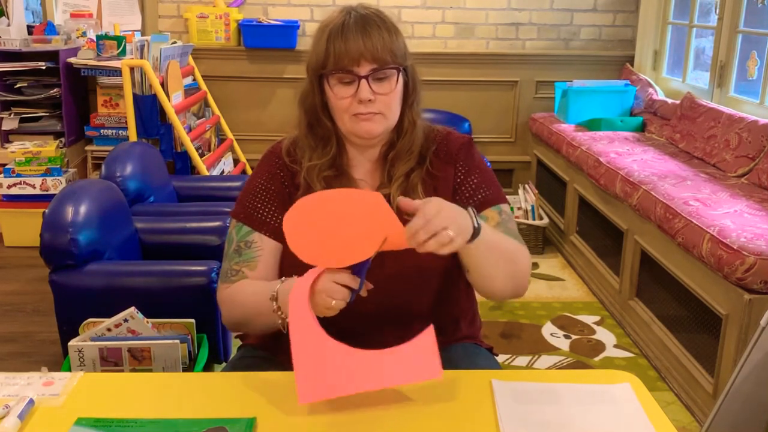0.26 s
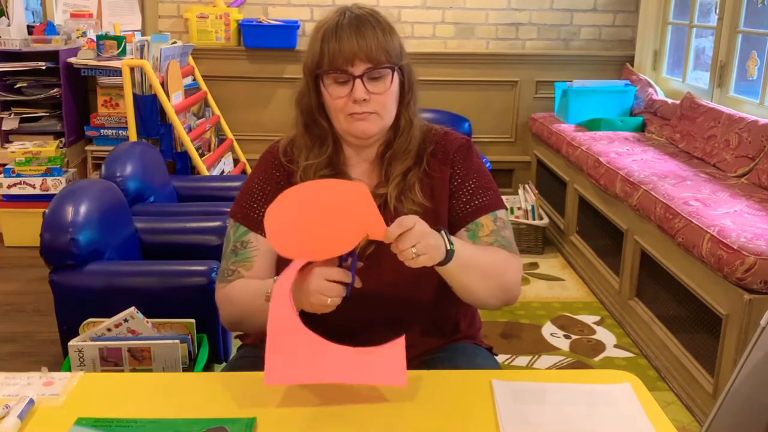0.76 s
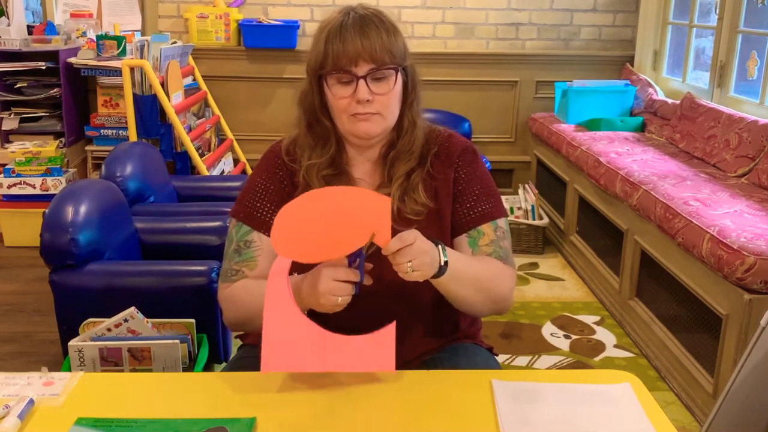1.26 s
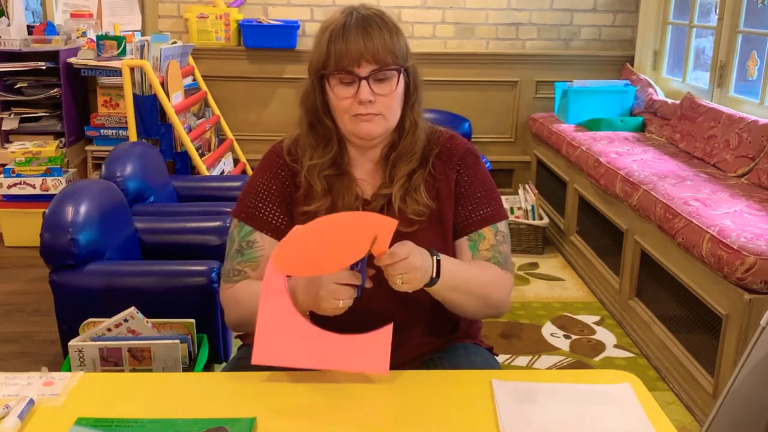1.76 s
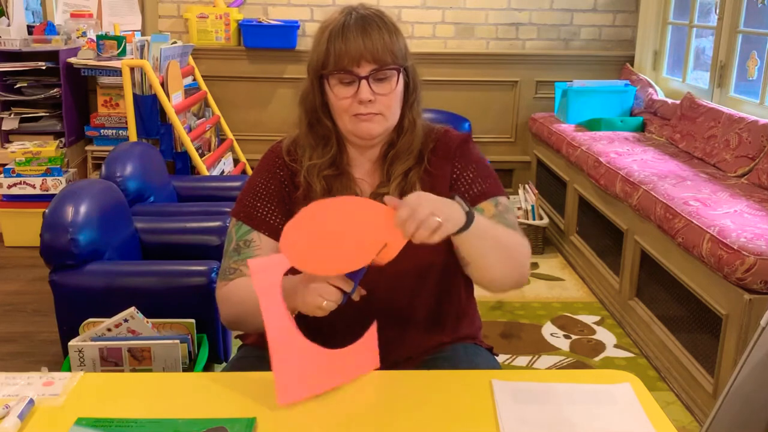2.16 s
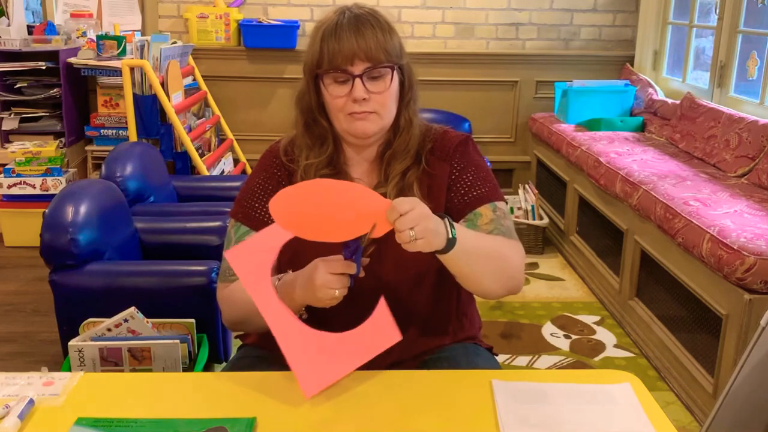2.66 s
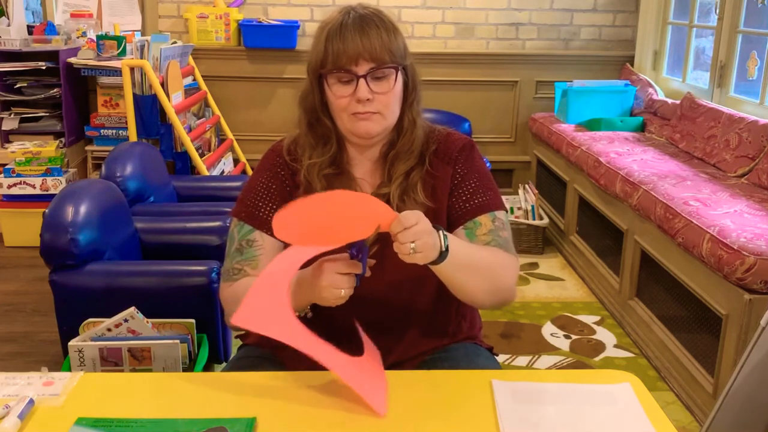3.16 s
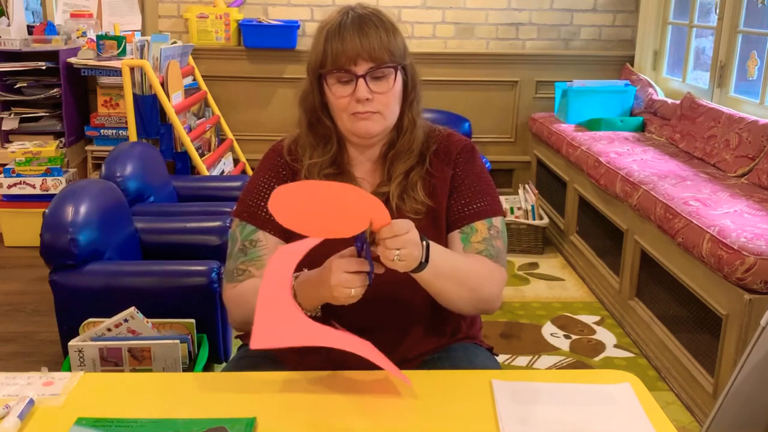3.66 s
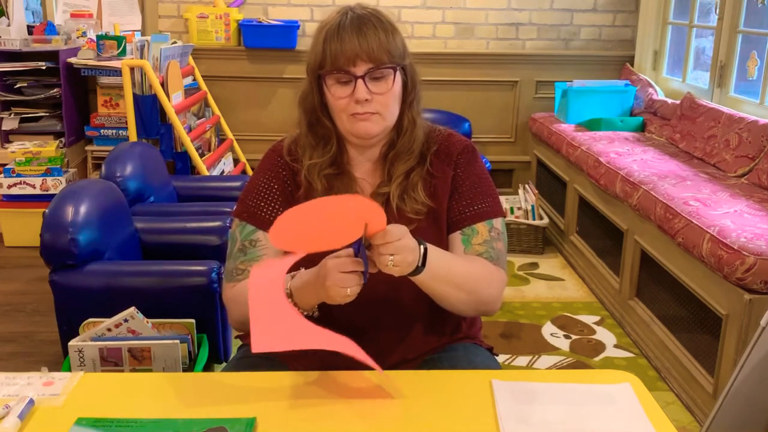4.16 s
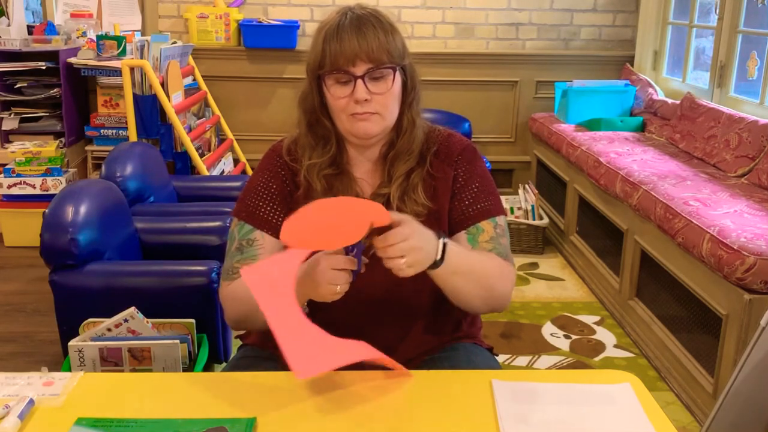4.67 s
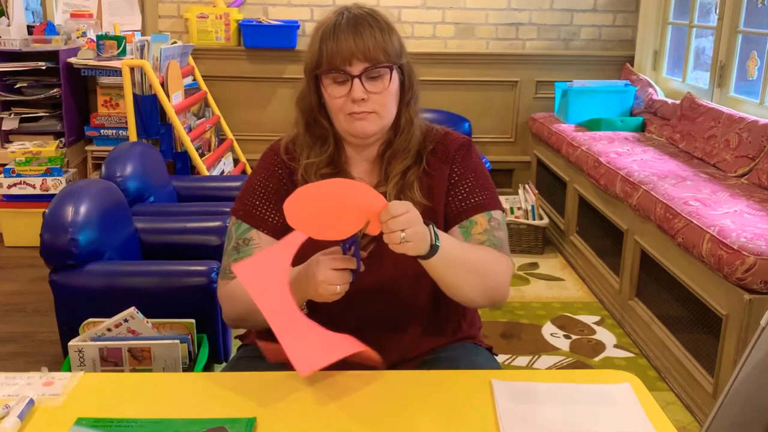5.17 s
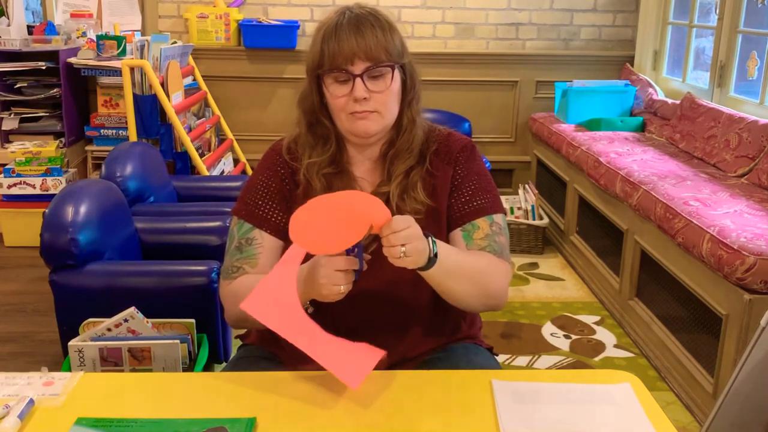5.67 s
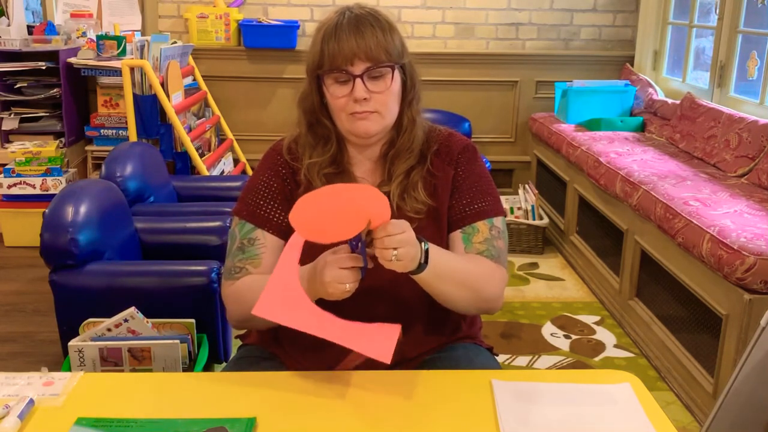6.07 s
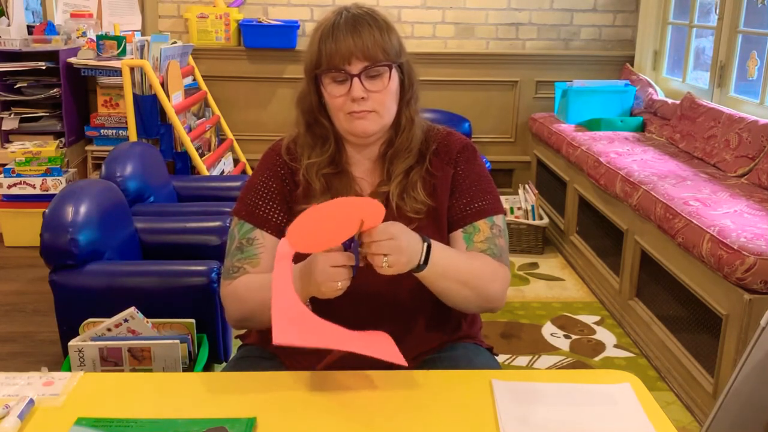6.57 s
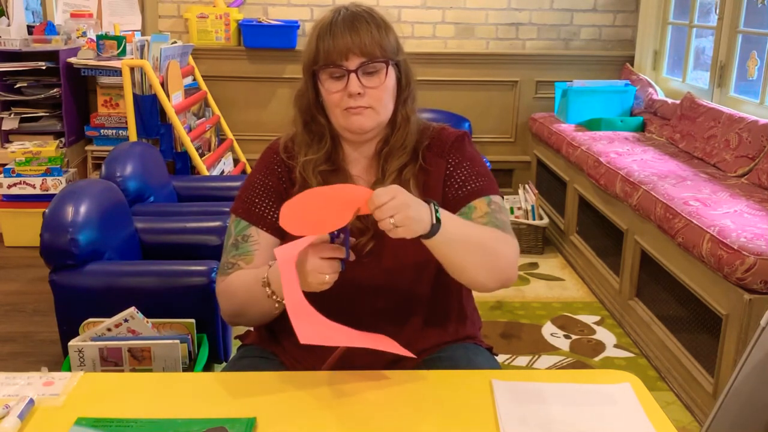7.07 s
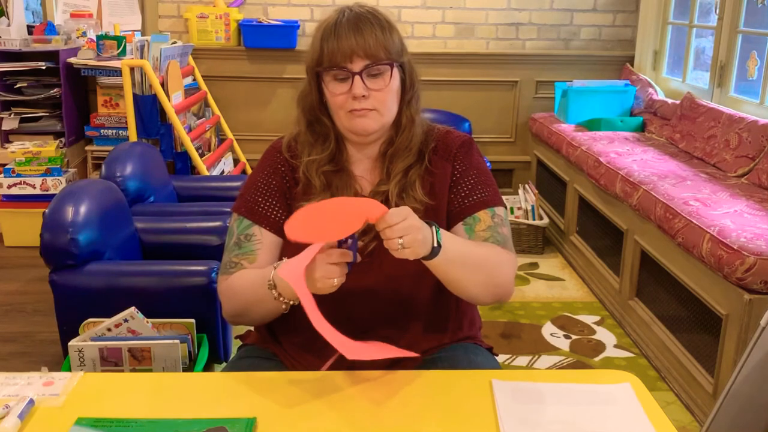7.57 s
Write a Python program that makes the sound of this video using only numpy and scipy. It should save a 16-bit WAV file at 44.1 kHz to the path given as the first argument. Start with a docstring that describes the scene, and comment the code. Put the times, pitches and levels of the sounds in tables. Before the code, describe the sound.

Crisp paper cutting, about four snips a second with short breaks, the stiff sheet rustling and buckling between cuts over faint ventilation hum.

```python
"""Small scissors snip stiff paper in a quiet playroom, about four times a second, in five runs.
Each snip closes the blades through a shower of breaking fibres, then reopens them more softly.
Between and during the runs the sheet slides, flaps, swishes, knocks and pops as it buckles.
Noise bursts pass through the resonances of paper and steel; sines make knocks, ventilation hum and far engines.
The room adds its echoes, and two close microphone ports give the left and right channels."""
import sys
import numpy as np
from scipy import signal
from scipy.fft import rfft, irfft
from scipy.io import wavfile

SR = 44100
rng = np.random.default_rng(int(sys.argv[2]) if len(sys.argv) > 2 else 0)


def output_pcm(signal):
    """Save a mono or channel-first signal as 16-bit PCM at the path in sys.argv[1].

    Samples are clipped to [-1, 1] before scaling.
    """
    pcm = np.clip(np.atleast_2d(signal).T, -1, 1) * 32767
    wavfile.write(sys.argv[1], SR, np.round(pcm).astype(np.int16))


N = 344862  # samples, about 7.8 s
# the pitches at which resonances are drawn, in Hz; the 1 keeps them above zero
HZ = np.fft.rfftfreq(2048, 1 / SR) + 1


def gain_of(db):
    """Turns decibels into an amplitude factor."""
    return 10 ** (np.asarray(db) / 20)


def evened(x):
    """Scales a sound to rms 1."""
    return x / np.sqrt(np.mean(x ** 2) + 1e-20)


def unit(x):
    """Scales a sound to energy 1."""
    return x / np.sqrt(np.sum(x ** 2) + 1e-20)


def read(points, hz):
    """Joins (f/Hz, value) points with straight lines on a log-frequency axis."""
    f, value = np.transpose(points)
    return np.interp(np.log(hz + 1), np.log(f + 1), value)


def add(mix, s, sound):
    """Mixes a sound in, starting at time s in seconds."""
    part = mix[max(round(s * SR), 0):][:len(sound)]
    part += sound[:len(part)]


def wander(count, step):
    """A random curve of spread about 1 that heads for a new value every step samples."""
    knots = rng.standard_normal(2048)
    return np.interp(np.arange(count) / step, np.arange(len(knots)), knots)


def swell(length_s, peak, ease=1):
    """The speed of a hand movement: from rest to a peak and back; more ease softens both ends."""
    along = np.linspace(0, 1, int(length_s * SR))
    return np.sin(np.pi / 2 * np.interp(along, [0, peak, 1], [0, 1, 0])) ** ease


def snaps(count, per_s, spread_db):
    """A shower of tiny breaks at random moments, most small and a few large; rms 1."""
    chance, size, sign = rng.random((3, count))
    heights = gain_of(spread_db * np.minimum(-np.log(1 - size), 4)) * np.sign(sign - .5)
    return evened(heights * (chance < per_s / SR))


def ring(gain):
    """How a body with this gain at each HZ answers a single tap: sound only after the tap, energy 1."""
    log_gain = np.log(np.maximum(gain / gain.max(), 1e-5))
    circle = np.concatenate([log_gain, log_gain[-2:0:-1]])
    # minimum phase: the Hilbert transform gives the phase that makes the response start at once
    return unit(np.fft.ifft(np.exp(np.conj(signal.hilbert(circle)))).real)


def modes(resonances):
    """The gain at each HZ of a set of (f/Hz, width/Hz, level/dB) resonances."""
    return np.sqrt(sum(gain_of(db) ** 2 / (1 + ((HZ - hz ** 2 / HZ) / width) ** 2)
                       for hz, width, db in resonances))


def ripple(db, per_octave=14):
    """The many small modes of a bent sheet: random peaks and dips in dB at each HZ."""
    knots = rng.standard_normal(2048)
    return db * np.interp(per_octave * np.log2(HZ), np.arange(len(knots)), knots)


def panel(hz, q, ripple_db, top_hz):
    """A patch of sheet: one broad resonance with small modes; paper radiates little bass or high treble."""
    power = 1 / (1 + (q * (HZ / hz - hz / HZ)) ** 2)
    power /= 1 + (HZ / top_hz) ** 6
    power /= (1 + (140 / HZ) ** 4) * (1 + (HZ / 5600) ** 4)
    return ring(np.sqrt(power) * gain_of(ripple(ripple_db)))


def travelling(drive, bodies):
    """Sounds the drive through each body in turn, fading from one to the next."""
    place = np.linspace(0, len(bodies) - 1, len(drive))
    return sum(signal.fftconvolve(np.maximum(1 - abs(place - k), 0) * drive, body)
               for k, body in enumerate(bodies))


def slips(speed, bodies):
    """Small slips drive parts of the sheet; about level 1 where the speed is greatest."""
    drive = speed * snaps(len(speed), per_s=2700, spread_db=2.5)
    return np.linalg.norm(speed) * unit(travelling(drive, bodies))


def rattle(body, rise_s, t60):
    """A shower of snaps through a body, quickly up and then dying away by 60 dB in t60 seconds; energy 1."""
    t = np.arange(SR // 4) / SR
    envelope = (1 - np.exp(-t / rise_s)) * gain_of(-60 * t / t60)
    return unit(signal.fftconvolve(snaps(len(t), per_s=4600, spread_db=2.0) * envelope, body))


def stereo_mix(z, hz):
    """Mixes two unrelated spectra to a set left-right likeness at each pitch."""
    # left-right likeness: f/Hz, likeness (1 same, 0 unrelated, -1 opposite)
    likeness = [(100, 0.67), (350, 0.91), (600, 0.16), (1500, -0.026), (3000, -0.11), (5800, -0.13),
                (8400, 1), (11000, 1), (15000, 0.84)]
    same = read(likeness, hz)
    shared = np.sqrt((1 + same) / 2) * z[0]
    apart = np.sqrt((1 - same) / 2) * z[1]
    return np.array([shared + apart, shared - apart])


def background():
    """Room air is shaped noise; ventilation and far engines are sines that drift in pitch and level."""
    # colour of the still air: f/Hz, relative level per Hz/dB
    air_colour = [(20, -51), (32, -10), (48, 4.5), (80, 6.5), (125, -1.5), (180, -4.5), (300, -18.5),
                  (500, -25), (1000, -31), (2500, -29), (6000, -38), (12000, -34.5), (16000, -45)]
    # steady lines of the ventilation: f/Hz, mean rms level/dB
    hum_lines = [(104, -62), (145, -78.5), (236, -73.5)]
    # one list for each far engine: t/s, firing rate f/Hz, mean rms level/dB
    engine_paths = [
        [(3.7, 52.8, -77), (4.3, 52.5, -58), (4.85, 52.9, -66), (5.2, 50, -56), (5.35, 49.7, -68),
         (5.48, 49.8, -80), (6.2, 52.64, -59), (6.42, 50.6, -48), (6.6, 46.7, -50.5), (6.68, 46.7, -68)],
        [(3.7, 69.8, -73), (4.4, 65.65, -64), (5.2, 63.9, -60), (5.55, 62.2, -59), (5.8, 60.4, -52),
         (6.05, 56.3, -52.5), (6.25, 56.2, -68), (6.7, 57.2, -63)],
    ]
    air_level_db, pitch_drift_hz, hum_waver_db, engine_throb_db = -61, 0.61, 0.9, 1.5
    hz, t = np.fft.rfftfreq(N, 1 / SR), np.arange(N) / SR

    noise = rfft(rng.standard_normal((2, N)))
    air = evened(irfft(stereo_mix(noise, hz) * gain_of(read(air_colour, hz)), N))

    def tone(pitch_hz, db):
        """A sine whose pitch drifts a little."""
        turns = np.cumsum(pitch_hz + pitch_drift_hz * wander(N, step=2800)) / SR
        return np.sqrt(2) * gain_of(db) * np.sin(2 * np.pi * turns)

    hum = sum(tone(f, db + hum_waver_db * wander(N, step=5600)) for f, db in hum_lines)
    engines = 0
    for s, rate_hz, db in map(np.transpose, engine_paths):
        level_db = np.interp(t, s, db) + engine_throb_db * wander(N, step=2500)
        engines = engines + tone(np.interp(t, s, rate_hz), level_db)
    return gain_of(air_level_db) * air + hum + engines


def room(x, wet_db=0):
    """Direct sound, quick reflections from table and hands, then walls; echoes change as the sheet sways."""
    # how long the walls ring: f/Hz, time to fade by 60 dB/s
    wall_t60 = [(200, 0.1), (1000, 0.47), (4000, 0.39), (12000, 0.2)]
    # how strong the walls are against the direct sound, before wet_db: f/Hz, level/dB
    wall_db = [(300, 3), (1000, -5.5), (4000, -2.5), (8000, -2), (14000, -26)]
    first_echo_s, near_db, near_t60 = 0.0023, -9, 0.032
    level_db, sway_s, count = -0.65, 0.31, 4  # count: different echo patterns, taken in turn

    def fade(t, db, t60):
        """An exponential decay that holds db of energy."""
        return gain_of(db - 60 * t / t60) * np.sqrt(np.log(10 ** 6) / (t60 * SR))

    wet, place = 0, np.arange(N) / SR / sway_s
    for k in range(count):
        hz, t, z = signal.stft(rng.standard_normal((2, SR // 2)), SR, nperseg=256)
        walls = fade(t, read(wall_db, hz)[:, None], read(wall_t60, hz)[:, None])
        decay = np.hypot(fade(t, near_db, near_t60), walls)
        tail = signal.istft(stereo_mix(z, hz[:, None]) * decay, SR, nperseg=256)[1]
        tail = tail * (np.arange(tail.shape[1]) > first_echo_s * SR)
        # each pattern fades in and out while its neighbours take over
        turn = np.sin(np.pi / 2 * np.minimum((place - k) % count, 2))
        wet = wet + signal.oaconvolve((turn * x)[None], tail, axes=1)[:, :N]
    return gain_of(level_db) * (x + gain_of(wet_db) * wet)


def crinkling(handling):
    """Faint creases tick at random in patches of the sheet, as strongly as it is being cut and rubbed."""
    level_db, ticks_per_s, spread_db, linger_s = -12, 22, 3, 0.013  # ticks per second in each patch
    highpass = signal.butter(2, 1000, "highpass", fs=SR, output="sos")
    rubbing = signal.sosfilt(highpass, handling)
    # a smoothed loudness curve of the handling
    keep = np.exp(-1 / (linger_s * SR))
    effort = np.sqrt(signal.lfilter([1 - keep], [1, -keep], rubbing ** 2 + 1e-20))
    out = np.zeros(N)
    for hz in np.geomspace(1200, 4200, 4):
        chance, size = rng.random((2, N))
        heights = gain_of(spread_db * np.minimum(-np.log(1 - size), 3))
        ticks = (chance < ticks_per_s / SR) * heights
        out += signal.oaconvolve(ticks, panel(hz, q=5.2, ripple_db=5, top_hz=2 * hz))[:N]
    return gain_of(level_db) * effort * evened(out)


def knocking():
    """The sheet flips its curve and swings for a few soft cycles on its two lowest modes, sinking in pitch; the
    row at 2.508 s is the table's echo of the knock just before it."""
    # dull knocks: t/s, relative level of the lowest mode/dB, pitch as the rise ends f/Hz, # rise/s, time to
    # fade by 60 dB/s; the row at 2.508 s is the table's echo of the knock at 2.4992 s
    knocks = [(0.3379, -36.5, 329, 0.0031, 0.092), (.367, -50, 330, 0.01, 0.13),
              (0.417, -34.5, 402, 0.0029, 0.057), (0.906, -44, 350.3, 0.025, 0.098),
              (1.126, -44, 336, 0.019, 0.1), (2.0064, -34.5, 390, 0.0014, 0.022),
              (2.241, -43.5, 336, 0.0033, 0.1), (2.298, -35, 364, 0.0034, 0.022),
              (2.4992, -35.5, 440, 0.0015, 0.0096), (2.508, -46.5, 340, 0.0032, .035),
              (2.651, -34, 486, 0.0028, 0.023), (3.999, -41.5, 484, 0.0029, 0.01),
              (4.381, -39, 335.6, 0.014, 0.085), (5.387, -41.5, 490, 0.0034, 0.041),
              (6.819, -39.5, 357, 0.0068, 0.055)]
    # second mode: multiple of the pitch, level against the first/dB
    multiple, upper_db = (1.5, -15)
    sag_per_s = 0.71  # the pitch sinks as the sheet relaxes
    out, t = np.zeros(N), np.arange(SR // 5) / SR
    for s, db, hz, rise_s, t60 in knocks:
        rise = np.sin(np.pi / 2 * np.minimum(t / rise_s, 1))
        envelope = rise * gain_of(-60 * np.maximum(t - rise_s, 0) / t60)
        angle = 2 * np.pi * np.cumsum(hz * np.exp(-sag_per_s * (t - rise_s))) / SR
        swing = np.sin(angle) + gain_of(upper_db) * np.sin(multiple * angle)
        add(out, s, gain_of(db) * envelope * swing)
    return out


def buckling():
    """A patch snaps through in a millisecond or two, rattles, and leaves the whole sheet shuddering."""
    # pops: t/s, relative level over 5 ms/dB, centre f/Hz, sharpness Q, top edge f/Hz,
    # share of energy in the rattle (0-1), time for the rattle to fade by 60 dB/s
    pops = [(.047, -49, 1710, 0.73, 4530, 0.8, 0.17), (0.4163, -32.5, 1120, 0.96, 3400, 0.93, 0.11),
            (0.523, -36, 1340, 1.6, 3800, 0, 0.14), (2.005, -30, 1060, 0.56, 3280, 0.3, 0.19),
            (2.0488, -41.5, 2210, 0.32, 5040, 1, 0.13), (2.097, -46, 970, 1.3, 2600, .05, 0.11),
            (2.197, -50.5, 1390, 0.48, 2700, 0.4, 0.078), (2.216, -40, 1160, 0.76, 2150, 0.56, 0.18),
            (2.296, -41, 844, 0.57, 2050, 0.67, 0.079), (2.325, -46.5, 800, .6, 2200, 0.35, .09),
            (2.8402, -32.5, 930, 1.4, 2060, 0.42, 0.18), (2.892, -38.5, 990, 0.25, 3450, 0.63, 0.1),
            (2.968, -32.5, 1010, 1.05, 2620, 0.68, 0.029), (3.036, -38, 940, 1.4, 2100, 0.45, 0.18),
            (3.0696, -35, 1470, 5.7, 2380, 0.6, 0.13), (3.1005, -30, 2540, 1.9, 6000, .25, 0.096),
            (4.256, -31, 870, 1.04, 2000, 0.16, 0.19), (4.493, -43, 3320, 6.1, 4200, 0.95, 0.073),
            (4.79, -58.5, 1290, 2.6, 1940, 1, 0.062), (5.287, -48, 1000, 3.2, 2000, 0.5, .11),
            (5.519, -40, 1430, 0.31, 3950, 0.6, 0.18), (5.5986, -40.5, 1070, 0.9, 2394, 0.5, 0.081),
            (5.9063, -43.5, 1298, 0.5, 3160, 0.5, 0.17), (5.995, -41.5, 1515, 4, 2300, 1, 0.051),
            (6.732, -55.5, 1780, 0.57, 4330, 1, 0.15), (6.775, -49.5, 1420, 1.2, 4600, 0.7, 0.092),
            (6.8029, -47, 2430, 0.2, 7200, .6, 0.021), (7.1521, -39.5, 974, 1.5, 2370, 0.7, 0.068),
            (7.1698, -38.5, 1316, 0.75, 3300, 0.45, .11), (7.4615, -38.5, 2800, 0.2, 6780, 0.12, 0.13)]
    crack_s, rise_s, rattle_rise_s = 0.00076, 0.00096, 0.0017
    shudder_db, shudder_hz, shudder_top_hz = -13, 500, 1400
    shudder_t60, shudder_rise_s = 0.28, 0.007
    out, t = np.zeros(N), np.arange(SR // 8) / SR
    for s, db, hz, q, top_hz, share, t60 in pops:
        patch = panel(hz, q, ripple_db=2, top_hz=top_hz)
        burst = rfft(rng.standard_normal(len(t)) * np.exp(-t / crack_s) * (1 - np.exp(-t / rise_s)))
        # a sudden snap pushes all pitches more evenly than plain noise would
        push = irfft(burst / np.sqrt(abs(burst) + 1e-12), len(t))[:len(t) // 2]
        size = gain_of(db) * np.sqrt(.005 * SR)  # energy 1 to a level over 5 ms
        add(out, s, size * np.sqrt(1 - share) * unit(signal.fftconvolve(push, patch)))
        add(out, s, size * np.sqrt(share) * rattle(patch, rattle_rise_s, t60))
        sheet = panel(shudder_hz, q=0.39, ripple_db=6.5, top_hz=shudder_top_hz)
        add(out, s, size * gain_of(shudder_db) * rattle(sheet, shudder_rise_s, shudder_t60))
    return out


def bending():
    """The whole sheet flaps low on its bending modes; a small patch swishes, its pitch moving as it bends."""
    # the loose end flaps, higher when less hangs free: t/s, length/s, relative level/dB, lowest mode f/Hz
    flaps = [(0.041, 0.094, -57, 347), (0.636, 0.065, -56, 416), (0.757, 0.11, -53.5, 413),
             (0.801, 0.045, -50, 525), (2.314, 0.039, -51.5, 352), (4.709, 0.21, -64, 328),
             (4.881, 0.11, -56, 322), (7.076, 0.078, -51.5, 362)]
    # bending modes: multiple of the lowest, width/Hz, relative level/dB
    flap_modes = [(1, 42, 3), (1.45, 137, -9)]
    # the sheet bends and rubs on the fingers: t/s, length/s, share of the length at its peak (0-1),
    # relative level/dB, start f/Hz, end f/Hz, sharpness Q
    swishes = [(0.312, 0.054, 0.36, -54.5, 1650, 1500, 0.46), (0.527, 0.061, 0.24, -51.5, 1390, 1450, 5.2),
               (2.013, 0.14, 0.076, -49.5, 1330, 1050, 0.25), (2.135, 0.43, 0.13, -60, 1700, 3300, 0.061),
               (2.615, 0.062, 0.74, -45, 1350, 1050, 1.6), (2.983, 0.12, .1, -50.5, 855, 1800, 1.9),
               (3.593, 0.15, 0.14, -68, 2450, 2600, 1.04), (4.592, 0.16, 0.11, -62.5, 1130, 1100, 4.3),
               (5.156, 0.056, 0.43, -44.5, 960, 780, 2.7), (5.307, 0.058, 0.58, -50.5, 1400, 980, 1.7),
               (5.936, 0.2, 0.19, -53.5, 1570, 1380, 12), (6.67, 0.1, 0.066, -68.5, 1700, 710, 0.51),
               (6.773, 0.096, 0.66, -52, 760, 370, 0.27), (7.349, 0.039, .35, -45, 1290, 1220, 2.3)]
    out = np.zeros(N)
    # bending paper radiates best between 200 and 750 Hz
    radiated = 1 / np.hypot(1, (HZ / 750) ** 2) / np.hypot(1, (200 / HZ) ** 2)
    for s, length, db, hz in flaps:
        resonances = [(hz * multiple, width, mode_db) for multiple, width, mode_db in flap_modes]
        body = ring(radiated * modes(resonances))
        add(out, s, gain_of(db) * slips(swell(length, peak=0.15), [body]))
    for s, length, peak, db, start_hz, end_hz, q in swishes:
        patches = [panel(hz, q, ripple_db=1.5, top_hz=2.54 * hz)
                   for hz in np.geomspace(start_hz, end_hz, 3)]
        add(out, s, gain_of(db) * slips(swell(length, peak), patches))
    return out


def clicking():
    """The blades meet with a brief chatter of steel: snaps through a few metal resonances."""
    # clicks: t/s, relative level over 5 ms/dB
    clicks = [(0.8096, -51.5), (0.874, -47), (1.8206, -50), (2.006, -51.5), (2.049, -53), (3.099, -38),
              (3.876, -54), (4.415, -52), (5.8123, -39), (6.518, -52), (7.1537, -44.5), (7.4592, -40)]
    # what the steel rings with: f/Hz, width/Hz, relative level/dB
    click_modes = [(2650, 210, 9.5), (5800, 2300, -1), (8900, 780, 7), (12600, 1700, -2)]
    out, steel = np.zeros(N), ring(modes(click_modes))
    for s, db in clicks:
        size = gain_of(db) * np.sqrt(.005 * SR)  # energy 1 to a level over 5 ms
        add(out, s, size * rattle(steel, rise_s=0.00017, t60=0.041))
    return out


def grip(s):
    """The thud in dB and the ring in Hz of the sheet as it is held at time s."""
    # the grip changes as the cut goes round: t/s, ring of the sheet f/Hz, thud level/dB
    grips = [(.7, 1410, 16.5), (1.8, 1300, 13.5), (2.35, 2000, 11.5), (2.85, 1760, 10), (3.8, 3640, 1.5),
             (4.45, 3500, 11), (4.95, 1720, 6.5), (5.6, 3100, 10.5), (6.25, 2530, 8), (6.5, 3150, 16.5),
             (7.35, 3018, 11), (7.8, 2960, 7)]
    times, ring_hz, thud_db = np.transpose(grips)
    return np.interp(s, times, thud_db), np.interp(s, times, ring_hz)


def stroke(speed, db, crunch_db, treble_db, ring_db, thud_db, ring_hz):
    """One cut, reopening or rub: tiny breaks in uneven clumps, coloured by the sheet and the blades."""
    # tiny breaks as the sheet radiates them: f/Hz, relative level per Hz/dB
    fibres = [(120, -22.5), (230, -13), (350, -1), (600, -0.5), (1000, 1.5), (1600, 4), (2400, -6),
              (3500, -3.5), (5000, -6.5), (6500, -14.5), (8000, -12.5), (10000, -13.5), (12500, -14),
              (15000, -24.5)]
    # steel blades: f/Hz, width/Hz, boost/dB
    blades = [(6570, 480, 8), (9400, 2100, 5.5)]
    judder_db, coarse_db = 1.5, -3.5
    ring_width, ring_drift, ring_glide = 0.36, 0.067, 0.063  # in natural-log units of frequency
    fizz_per_db, usual_db = 0.35, -48.5

    clumps = gain_of(judder_db * wander(len(speed), step=156))
    fine = snaps(len(speed), per_s=7000, spread_db=2.5)
    coarse = snaps(len(speed), per_s=300, spread_db=1.5)
    breaks = speed * evened(clumps * fine + gain_of(coarse_db) * coarse)

    tilt = [(350, thud_db), (700, 0), (1900, 0), (2750, crunch_db), (4300, treble_db / 2), (6000, treble_db)]
    colour_db = read(fibres, HZ) + ripple(2.5) + read(tilt, HZ)
    # a harder stroke fizzes more at the top
    colour_db += read([(6000, 0), (10000, fizz_per_db * (db - usual_db))], HZ)
    opening = 1 + 0.015 * rng.standard_normal()  # shifts the blade pitches a little each time
    for f, width, lift_db in blades:
        colour_db += lift_db / (1 + ((HZ - f * opening) / (width / 2)) ** 2)

    detune = np.log(HZ / ring_hz) + ring_drift * rng.standard_normal()
    stages = []
    # the ring glides and the small modes change within each stroke
    for along in np.linspace(-.5, .5, 6):
        peak_db = ring_db / (1 + ((detune - ring_glide * along) / ring_width) ** 2)
        stages.append(ring(gain_of(colour_db + ripple(5.0) + peak_db)))
    return gain_of(db) * travelling(breaks, stages)


def scissors():
    """Each snip closes, rests a moment and reopens; scrapes and rubs sound through the same stroke."""
    # one row a snip: t/s, closing time/s, share of the closing at top speed (0-1), relative level/dB,
    # fibre crunch/dB, blade treble/dB, reopening against closing level/dB
    snips = [(.669, 0.07, 0.3, -50, 16, 8.5, -4.5), (0.844, .12, 0.23, -46.5, 11.5, 4.5, -8),
             (1.082, 0.11, 0.23, -44.5, 7.5, 3.5, -7.5), (1.319, 0.096, 0.24, -44.5, 11.5, 7.5, -7.5),
             (1.536, .11, 0.28, -47, 8.5, 8, -3.5), (1.749, 0.071, 0.76, -47, 14, 6.5, -15),
             (2.59, 0.14, 0.22, -43.5, 9, 5.5, -10.5), (2.826, 0.11, 0.43, -44.5, 6, 0, -2),
             (3.058, .11, 0.3, -42.5, 8, 2, -9), (3.268, .13, 0.26, -46, 7, 4.5, -10.5),
             (3.774, 0.13, 0.31, -44.5, 3.5, -3, -7.5), (4.005, .11, 0.16, -48, 4, -1, -2),
             (4.216, .1, 0.34, -47.5, 5, 2, -5), (4.415, 0.16, 0.16, -52, 5.5, 5, -15),
             (5.14, 0.11, 0.21, -44, 9, 10, -11), (5.362, .11, 0.35, -44.5, 2, -1, -4),
             (5.561, .12, 0.28, -49, 1, 2, -2.5), (5.782, 0.11, 0.53, -49.5, -3, 3, -2.5),
             (6.025, 0.13, 0.34, -50.5, 6, 4.5, -0.5), (6.246, 0.11, 0.37, -47, 8, 4, -3.5),
             (6.448, .13, 0.25, -49.5, 11, 6.5, -39), (7.062, .14, 0.29, -46, 2.5, 2, -4.5),
             (7.321, 0.11, 0.19, -47, 4, 8, -5), (7.533, 0.11, 0.52, -45.5, 4.5, 3, -5),
             (7.731, 0.1, 0.37, -48.5, 6, 1, -7.5)]
    # scrapes and rubs: paper along the blades, soft finger rubs, one bright reopening scrape:
    # t/s, length/s, relative level/dB, treble/dB
    rubs = [(0, 0.024, -45, -5), (0.45, 0.16, -54, 12), (2.144, 0.058, -54.5, -1), (2.332, 0.12, -56, 7),
            (4.711, 0.15, -71.5, 4), (4.887, 0.19, -58, 5.5), (6.668, 0.16, -71, 17),
            (6.898, .13, -54.5, 9), (7.223, 0.087, -46, 20)]
    level_db, ease = 0.5, 1.5
    pause_s, reopen_s, reopen_peak = 0.014, 0.11, 0.33
    # steel rubs on steel when reopening: brighter, with less push on the sheet
    reopen_treble_db, reopen_thud_db = 1, -0.5
    # reopenings and rubs have one fixed crunch; reopenings have their own ring, rubs share the closing's
    fixed_crunch_db, reopen_ring_db, cut_ring_db = 2, 6, 6.5

    out = np.zeros(N)
    for s, length, peak, db, crunch_db, treble_db, reopen_db in snips:
        thud_db, ring_hz = grip(s)
        closing = stroke(swell(length, peak, ease), db, crunch_db, treble_db,
                         cut_ring_db, thud_db, ring_hz)
        add(out, s, closing)
        reopening = stroke(swell(reopen_s, reopen_peak, ease), db + reopen_db, fixed_crunch_db,
                           treble_db + reopen_treble_db, reopen_ring_db, thud_db + reopen_thud_db, ring_hz)
        add(out, s + length + pause_s, reopening)
    for s, length, db, treble_db in rubs:
        speed = swell(length, 0.19, ease)
        add(out, s, stroke(speed, db, fixed_crunch_db, treble_db, cut_ring_db, *grip(s)))
    return gain_of(level_db) * out


def scene():
    """All the paper and scissors sounds in the room, over its background."""
    handling = scissors() + bending()
    paper = room(handling + crinkling(handling) + buckling() + clicking())
    return paper + room(knocking(), wet_db=-2.0) + background()


def record(dry):
    """The two ports shift phase and balance between left and right; then the highest treble is cut."""
    # f/Hz, phase by which the left leads/rad
    port_phase = [(0, 0), (1800, .2), (3000, 1.4), (5400, 1.5), (6800, 0), (7700, -2.6), (9000, -3.6),
                  (10900, -6.3), (12800, -9), (15300, -12.5)]
    # f/Hz, left against right level/dB
    port_balance = [(300, -0.5), (1200, 1.5), (2700, 0), (5700, -2.5), (7000, -0.5), (12000, 0)]
    edge_hz = 15900
    hz = np.fft.rfftfreq(N, 1 / SR)
    # half of each difference goes to the left, the opposite half to the right
    left = np.exp(.5j * np.interp(hz, *np.transpose(port_phase))) * gain_of(read(port_balance, hz) / 2)
    ports = irfft(rfft(dry) * np.array([left, 1 / left]), N)
    lowpass = signal.firwin(511, edge_hz, window=("kaiser", 9), fs=SR)
    return signal.oaconvolve(ports, lowpass[None], "same")


dry = scene()
out = record(dry)
output_pcm(out)
```